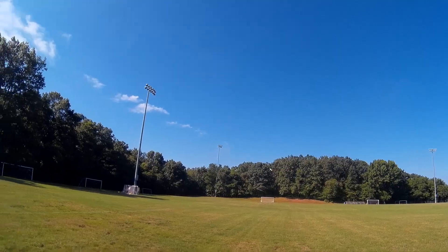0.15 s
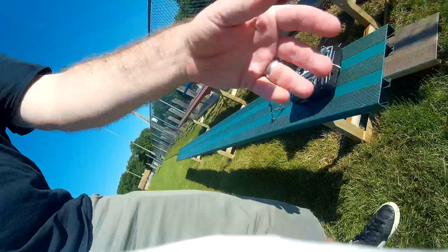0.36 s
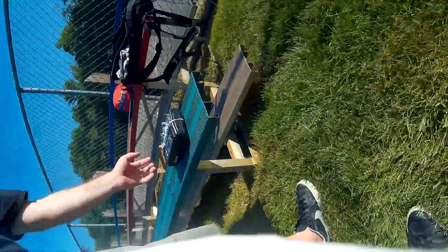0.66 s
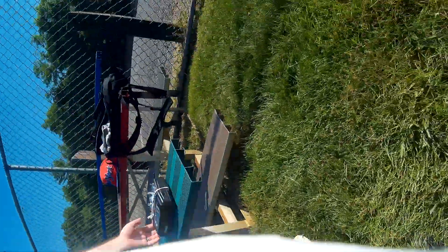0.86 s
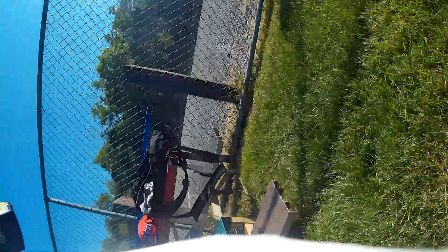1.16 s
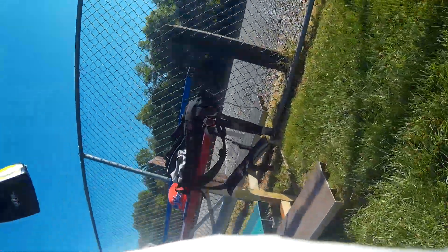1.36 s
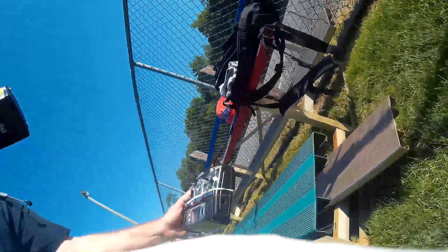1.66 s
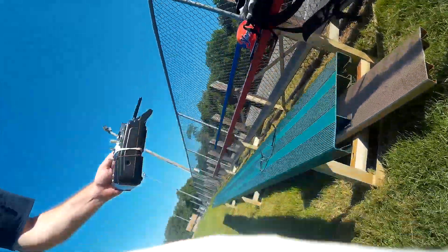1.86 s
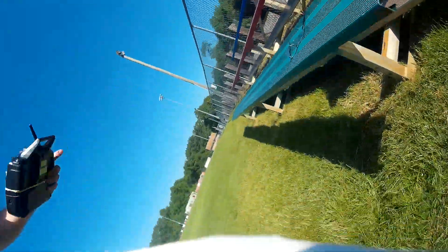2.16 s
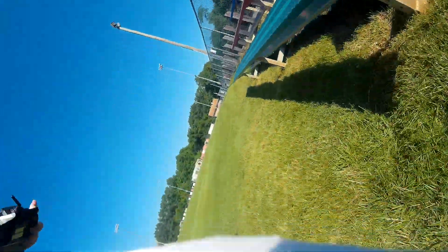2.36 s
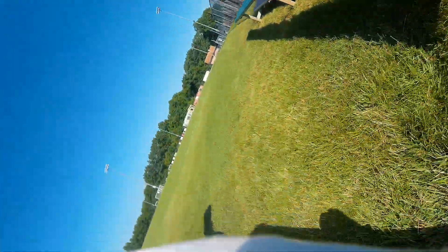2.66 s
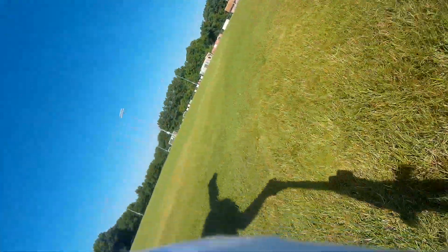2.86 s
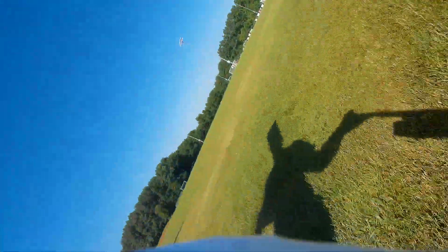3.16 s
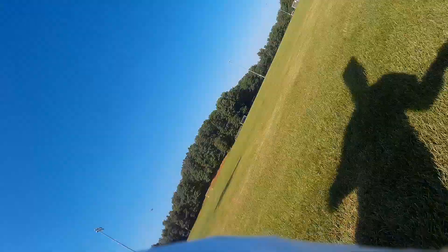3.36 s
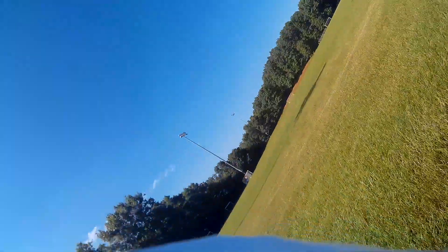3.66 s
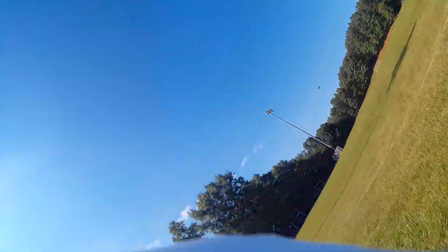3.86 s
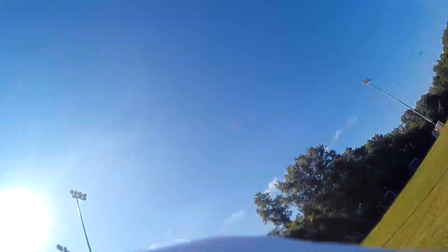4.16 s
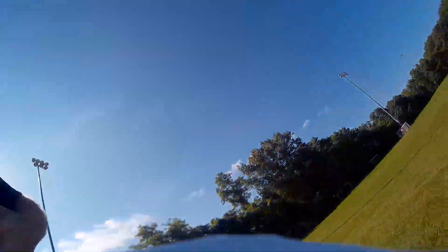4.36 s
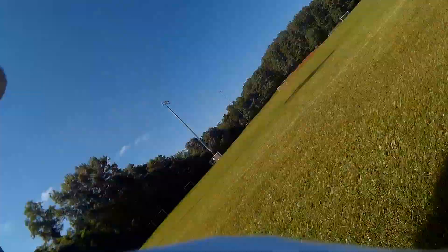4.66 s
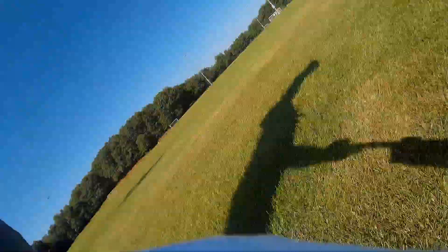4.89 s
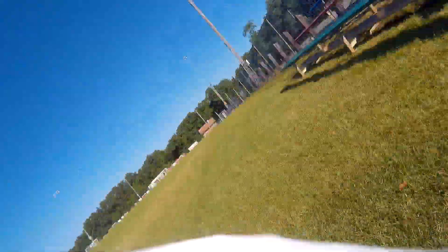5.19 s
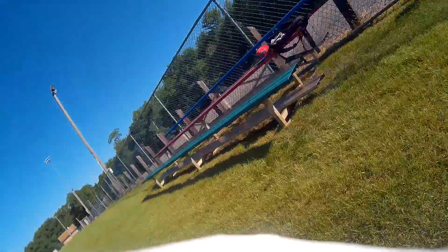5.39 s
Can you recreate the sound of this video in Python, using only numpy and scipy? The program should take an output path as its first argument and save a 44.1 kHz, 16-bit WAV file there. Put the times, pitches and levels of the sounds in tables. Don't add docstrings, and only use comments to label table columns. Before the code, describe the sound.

Open grassy field, close body-mounted microphone. Soft gusts and hiss lie under bird whistles and small taps on foam, with a hollow clunk before the middle. After low handling thumps, a small brushless motor kicks, stutters and surges into a loud buzz, clicks sharply, whirs down with a thin high whine, and stops; birds return.

```python
import sys
import numpy as np
from scipy import signal
from scipy.io import wavfile
from scipy.ndimage import uniform_filter1d

SR = 44100
rng = np.random.default_rng(int(sys.argv[2]) if len(sys.argv) > 2 else 0)


def gain_from_decibels(decibels):
    exponent = np.asarray(decibels, float) / 20
    return 10 ** exponent


def wav_out(sig):
    wavfile.write(sys.argv[1], SR, np.round(np.clip(np.atleast_2d(sig).T, -1, 1) * 32767).astype(np.int16))


N = 243873

# (t/s, speed/turns per s)
SHAFT_SPEED = [
    (3.393, 3.2),
    (3.425, 8),
    (3.47, 24.5),
    (3.52, 35),
    (3.6, 43),
    (3.67, 51.5),
    (3.785, 99),
    (3.83, 108.5),
    (3.87, 104),
]
# (t/s, level/dB)
MOTOR_EFFORT = [
    (3.362, -36),
    (3.385, -32.5),
    (3.446, -20.5),
    (3.566, -20),
    (3.578, -28),
    (3.62, -21),
    (3.64, -17),
    (3.82, -12.5),
    (3.89, -18),
]
RELEASE_S = 4.585


def evened(x):
    return x / np.sqrt(np.mean(x ** 2) + 1e-20)


def steady(x, size):
    return x / np.sqrt(uniform_filter1d(x ** 2, size) + 1e-12)


def drift(length, size):
    return evened(uniform_filter1d(rng.standard_normal(length), size=size))


def read(points, hz):
    f, value = np.transpose(points)
    return np.interp(np.log(hz + 1), np.log(f + 1), value)


def add(mix, s, sound):
    part = mix[round(s * SR):][:len(sound)]
    part += sound[:len(part)]


def noise(spectrum, size, patchy_db, length=N):
    frames = length * 4 // size + 5
    hz = np.fft.rfftfreq(size, 1 / SR)
    a, b, patches = rng.standard_normal((frames, len(hz), 3)).T
    patches = uniform_filter1d(patches, size=6, axis=0)
    patches = evened(uniform_filter1d(patches, size=6, axis=1))
    z = (a + 1j * b) * gain_from_decibels(read(spectrum, hz)[:, None] + patchy_db * patches)
    sound = signal.istft(z, nperseg=size, noverlap=size * 3 // 4)[1]
    return evened(sound[:length])


def swells(rows):
    t = np.arange(N) / SR
    return sum(db * np.exp(-((t - s) / half) ** 2) for s, half, db in rows)


def wind():
    # (f/Hz, level/dB)
    colour = [(8.8, -37.5), (15, -16.5), (33, 6.5), (103, 3), (346, -12), (438, -28), (500, -17),
              (650, -36), (1100, -120)]
    # (middle t/s, half length/s, rise/dB)
    gusts = [
        (.55, 0.19, 2.5),
        (1.48, 0.17, 13),
        (1.74, 0.069, 7.5),
        (3.25, 0.12, 8.5),
        (4.0, .6, 6),
        (4.75, 0.33, 10),
        (5.35, 0.2, 9),
    ]
    return noise(colour, size=2048, patchy_db=2.5) * gain_from_decibels(-66 + swells(gusts))


def rustle():
    # (f/Hz, level/dB)
    colour = [(150, -34), (250, -4.5), (511, 8), (616, 3), (1260, 4.5), (1960, -5), (2600, -8),
              (3380, -25.5), (5720, -120)]
    # (middle t/s, half length/s, rise/dB)
    shuffles = [
        (.72, .12, 11.5),
        (1.1, .15, 6),
        (1.52, .1, 13),
        (1.95, .3, 7),
        (2.85, .15, 7),
        (3.25, .12, 9.5),
        (4.2, .7, 8.5),
        (4.85, .2, 4),
        (5.3, .2, 7),
    ]
    return noise(colour, size=512, patchy_db=2.0) * gain_from_decibels(-76.5 + swells(shuffles))


def preamp_hiss():
    # (f/Hz, level/dB)
    colour = [(120, -31), (200, -6), (498, -16.5), (575, -17.5), (652, -3.5), (915, -16), (1240, -6),
              (5580, -6.5), (14400, -10)]
    return gain_from_decibels(-72) * noise(colour, size=1024, patchy_db=.5)


def bird(length, hz0, hz1, db, blur_hz):
    n = round(length * SR)
    hz = np.linspace(hz0, hz1, n) + blur_hz * drift(SR // 2, size=60)[:n]
    return gain_from_decibels(db) * np.sin(2 * np.pi * np.cumsum(hz) / SR) * signal.windows.tukey(n, .6)


def treeline(x):
    t = np.arange(SR // 2) / SR
    tail = rng.standard_normal(len(t)) * gain_from_decibels(-60 * t / 0.44) * np.clip(t / 0.0029, 0, 1)
    return signal.oaconvolve(x, tail / np.linalg.norm(tail))[:N]


def far_birds():
    # (start t/s, length/s, start f/Hz, end f/Hz, level/dB)
    whistles = [(.083, 0.2, 5300, 5060, -81), (.616, .075, 3560, 3030, -60.5), (.66, .065, 3213, 2780, -49),
                (1.478, 0.031, 2240, 2750, -69), (1.505, 0.078, 2790, 2480, -63.5),
                (1.56, 0.027, 2090, 2500, -75), (1.598, 0.031, 3000, 2730, -72),
                (1.484, .07, 1950, 2170, -73), (1.52, 0.037, 3150, 3020, -67.5),
                (1.63, .05, 2730, 3130, -70), (1.662, 0.031, 1650, 3190, -68),
                (1.876, 0.023, 3050, 3300, -66), (1.92, 0.1, 4120, 4320, -69),
                (2.66, .026, 3000, 2950, -74), (2.685, 0.059, 3710, 2210, -63.5),
                (2.8, 0.026, 2700, 2280, -68), (2.89, 0.13, 3560, 4000, -78),
                (5.055, 0.03, 2700, 2560, -77.5), (5.07, 0.056, 1914, 1690, -71),
                (5.418, 0.024, 1510, 2530, -63.5), (5.433, 0.064, 2500, 2750, -52)]
    # (start t/s, length/s, start f/Hz, end f/Hz, level/dB)
    chirps = [
        (.426, 0.047, 5450, 5170, -67.5),
        (.778, .032, 5500, 2430, -65.5),
        (1.806, .04, 6800, 6600, -76),
        (1.885, .06, 3400, 4000, -68),
        (1.99, .058, 5600, 5400, -71),
        (2.834, 0.046, 3750, 4600, -71),
        (5.242, .048, 5010, 3620, -58.5),
        (5.28, 0.082, 4480, 6100, -66.5),
        (5.31, .05, 6800, 6940, -67.5),
        (5.496, 0.013, 2350, 3200, -53),
    ]
    birds = np.zeros(N)
    for rows, blur_hz in ((whistles, 44), (chirps, 260)):
        for s, *note in rows:
            add(birds, s, bird(*note, blur_hz))
    return birds + gain_from_decibels(-3.5) * treeline(birds)


def body(tilt_db, deep=False):
    # (f/Hz, level/dB)
    colour = [(29, -54), (50, -28), (91, -13), (343, -11), (422, 0), (582, -6.5), (839, 1.5), (1670, 2),
              (2360, -11.5), (3100, -5), (3480, -15), (5890, -10.5), (12000, -56.5), (15600, -65),
              (22000, -120)]
    # (f/Hz, width/Hz, level/dB)
    panels = [(427, 44, 6), (722, 260, 11.5), (1044, 25, 8), (1271.3, 140, -2), (1574, 230, 5),
              (2010, 32, 8), (2410, 130, -10.5), (2632, 350, 5.5), (3030, 330, 6), (4050, 390, 6.5),
              (4530, 240, 3), (5300, 160, 8), (6030, 190, 2.5)]
    hz = abs(np.fft.fftfreq(4096, 1 / SR))
    db = read(colour, hz) + sum(g / (1 + (2 * (hz - f) / w) ** 2) for f, w, g in panels)
    db = db + tilt_db * np.log10(hz / 1000 + .1)
    gain = np.log(gain_from_decibels(np.maximum(db, -100)))
    ring = np.fft.ifft(np.exp(np.conj(signal.hilbert(gain)))).real[:2048]
    for delay in (17, 41, 73) if deep else ():
        loop = np.r_[1, np.zeros(delay - 1), -.55]
        ring = signal.lfilter(loop[::-1], loop, ring)
    return ring


def body_blows(mix):
    # (t/s, peak level/dB, brightness/dB per decade)
    blows = [(.523, -52, 21), (0.587, -49, 6), (0.715, -41, 0), (0.741, -42.5, 6), (.8, -47, 19),
             (0.937, -46.5, 5), (1.014, -47.5, -1), (1.088, -45, 5.5), (1.161, -45, 9.5), (1.39, -36, -10),
             (2.088, -56, 4), (3.134, -49, 35), (3.315, -49.5, 16.5), (3.363, -24.5, -17.5),
             (3.373, -20, -18), (4.816, -43.5, -11), (4.826, -41, -36), (5.065, -51.5, 7)]
    for s, db, tilt_db in blows:
        blow = body(tilt_db, deep=tilt_db < 0)
        add(mix, s, gain_from_decibels(db) * blow / abs(blow).max())


def dry_ticks(mix):
    # (t/s, peak level/dB, f/Hz, length/ms)
    ticks = [(1.2841, -43, 10800, .23), (1.2821, -57, 12900, .21), (1.2826, -56, 7600, .4),
             (1.3351, -56, 10000, .7), (1.3491, -55, 5050, .9), (3.1331, -63, 4400, .7),
             (3.3151, -64, 4200, .7), (3.3761, -49, 7100, .9), (3.9854, -25, 12400, .26),
             (3.9864, -4, 5150, .12), (3.9854, -18, 7200, .25), (3.986, -20, 9700, .25),
             (3.9864, -12, 4100, .23), (4.543, -58, 5300, .8)]
    for s, db, hz, ms in ticks:
        u = np.arange(400) / SR * 1000 / ms
        swell = np.e * u * np.exp(-u)
        add(mix, s, gain_from_decibels(db) * swell * np.sin(2 * np.pi * hz * u * ms / 1000))


def knock():
    # (f/Hz, level/dB, t60/s)
    hollow = [(526, -10.5, 0.87), (667, -11, 0.79), (950, -3, 0.81), (1120, -6, 0.59), (1400, 11, 0.051),
              (1580, 6.5, 0.11), (1415, -9, 0.9), (1693, -7.5, 0.5), (2160, -13, 0.24), (2910, -32, 3.7)]
    # (f/Hz, level/dB)
    colour = [(120, -40), (200, 7), (447, -14), (522, -15), (1190, -9), (1410, -3), (2440, -22),
              (2750, -18.5), (12000, -51), (15600, -76.5), (22000, -120)]
    t = np.arange(SR // 2) / SR
    modes = np.zeros(len(t))
    for hz, db, t60 in hollow:
        rattle_db = 4 * drift(len(t), size=500)
        modes += gain_from_decibels(db - 60 * t / t60 + rattle_db) * np.sin(2 * np.pi * hz * t)
    modes *= np.clip(t / .002, 0, 1)
    decay = 0.433 * gain_from_decibels(-60 * t / 0.021) + 0.19 * gain_from_decibels(-60 * t / 0.38)
    spray = noise(colour, size=256, patchy_db=-0.5, length=len(t)) * decay
    return gain_from_decibels(-33) * (0.2 * modes + spray)


def finger_thumps(mix):
    # (t/s, peak level/dB, f/Hz)
    thumps = [(1.72, -40, 170), (3.117, -42, 230), (3.14, -34.5, 260), (3.171, -41, 186), (3.177, -30, 167),
              (3.201, -30, 94), (3.219, -26.5, 131), (3.266, -51, 100), (3.29, -37, 143), (3.315, -33, 121),
              (5.004, -38, 113)]
    for s, db, hz in thumps:
        u = np.arange(1500) * hz / SR
        add(mix, s, gain_from_decibels(db) * (1 - 3.4 * u) * np.exp(-3.5 * u) * np.clip(u * 8, 0, 1))


def shaft(t):
    drag_per_s, rub = 1.85, 15
    free_s, top = SHAFT_SPEED[-1]
    coast = (top + rub) * np.exp(-drag_per_s * (t - free_s)) - rub
    return np.where(t < free_s, np.interp(t, *np.transpose(SHAFT_SPEED)), coast)


def surges(t):
    # (start t/s, cut t/s, level/dB)
    pushes = [
        (3.44, 3.471, 9),
        (3.485, 3.508, 6),
        (3.518, 3.541, 8),
        (3.545, 3.568, 9),
        (3.625, 3.69, 3),
    ]
    return sum(db * np.interp(t, [a, a + 0.2 * (b - a), b, b + 0.0016], [0, 1, 1, 0]) for a, b, db in pushes)


def shake_level(t, on, speed_db):
    grip = np.interp(t, [4.37, RELEASE_S, RELEASE_S + 0.024], [0, 1, 0])
    coasting_db = (1 - on) * (-4 + 1.827 * speed_db)
    return np.interp(t, *np.transpose(MOTOR_EFFORT)) + 8.5 * grip + coasting_db


def pulses(turn, speed, per_turn, count, odd, slope_db):
    train = 0
    for k in range(1, count):
        gain = (odd if k % 2 else 1) * gain_from_decibels(slope_db * np.log2(k))
        train = train + gain * np.cos(k * per_turn * turn) * (k * per_turn * speed < 9000)
    return train


def coil_kicks(speed, speed_db, turn, late, switch):
    # (share of switching tone, cycles per turn, level/dB, slope/dB per dB of speed)
    folds = [
        (0, 42, -3, .3),
        (.5, -21, -3, 5),
        (.5, 0, -10, 2.5),
        (1, -21, -1, 6),
        (1, -42, -14, .4),
    ]
    limp = .7 * np.clip((speed - 24) / 10, .12, 1)
    kicks = pulses(turn + .014 * late, speed, 21, count=110, odd=limp, slope_db=-3)
    whistles = sum(gain_from_decibels(db + p * speed_db) * np.cos(share * switch + k * (turn + .012 * late))
                   for share, k, db, p in folds)
    return steady(kicks, size=2000) + whistles


def cogging(speed, turn, uneven, falter, switch):
    # (cycles per turn, level/dB)
    orders = [(12, -12), (14, -6), (28, -12), (36, -8), (42, 0), (72, -10), (84, -6.5)]
    cogs = evened(sum(gain_from_decibels(db) * np.cos(k * turn) / (1 + (k * speed / 2200) ** 16) for k, db in orders))
    cogs = cogs * (1 + .3 * np.cos(2 * turn) + .3 * uneven) * gain_from_decibels(2.5 * falter)
    return cogs + gain_from_decibels(-4) * np.cos(switch - 84 * turn) / (1 + (speed / 27) ** 6)


def blade_thrust(speed, speed_db, turn):
    # (cycles per turn, level/dB)
    tones = [(1, -35), (2, -35.5), (3, -47), (4, -28), (5, -34), (6, -33), (8, -27), (10, -31), (12, -32)]
    return sum(gain_from_decibels(db + (1.9 + .5 * k) * speed_db) * np.cos(k * turn) / (1 + (68 / k / speed) ** 8)
               for k, db in tones)


def tip_hiss(passes, on, speed_db):
    # (f/Hz, level/dB)
    colour = [(1470, -28), (2500, 1), (3020, -5), (3610, -6.5), (5890, -9), (11600, -18.5), (14400, -22)]
    hiss = noise(colour, size=256, patchy_db=.8, length=len(passes))
    return hiss * steady(passes, size=4000) * gain_from_decibels(-42 + 2.63 * speed_db + 5 * on + 11.5)


def controller_whine(t, on, speed_db, turn, switch):
    # (cycles per turn, coasting level/dB, throttle level/dB)
    sides = [(0, 0, 0), (-2, -1, -8), (14, -11, -11), (-14, -6, -14)]
    whine = sum(gain_from_decibels(off + (full - off) * on) * np.cos(switch + k * turn) for k, off, full in sides)
    fade_db = 65.5 * np.maximum(t - RELEASE_S, 0)
    return gain_from_decibels(-54.5 + 0.65 * speed_db + 12.5 * on - fade_db + 6.5) * whine


def motor():
    t = np.arange(MOTOR_EFFORT[0][0], 4.83, 1 / SR)
    speed = shaft(t)
    speed_db = 20 * np.log10(speed / 100)
    turn = 2 * np.pi * np.cumsum(speed) / SR + 2.0
    switch = 2 * np.pi * 7979 * t
    on = 1 / (1 + np.exp((t - 3.9) / 0.0076))
    surge_db = surges(t)
    uneven, late, falter = drift(len(t), 50), drift(len(t), 50), drift(len(t), 500)

    coils = coil_kicks(speed, speed_db, turn, late, switch) * (1 + .5 * uneven) * gain_from_decibels(3 * falter)
    coil_db = 6 - .45 * speed_db - 10 * np.clip((t - 3.825) / 0.013, 0, 1)
    core = gain_from_decibels(coil_db - 6.5 + 0.15 * surge_db) * on * coils
    core += gain_from_decibels(-4) * (1 - on) * cogging(speed, turn, uneven, falter, switch)

    slaps = evened(pulses(turn + .02 * late, speed, 1, count=40, odd=.6, slope_db=-1.5))
    slaps = slaps * (1 + .15 * uneven)
    slap_db = on * -7 + (1 - on) * np.minimum(-6 - 0.48 * speed_db, 15)
    passes = .6 + 1.6 * (speed / 100) ** 1.2 * np.exp(5 * (np.cos(2 * turn) - 1))
    rush_db = 5.5 + 0.083 * on * speed_db - 9 * np.clip((t - RELEASE_S) / .02, 0, 1)
    blades = gain_from_decibels(slap_db + 1.5 + 1.5 * speed_db) * slaps
    blades += gain_from_decibels(rush_db) * passes * rng.standard_normal(len(t))

    shake = signal.oaconvolve(core, body(tilt_db=4.5, deep=True))
    shake += signal.oaconvolve(blades, body(tilt_db=2.5))
    shake = steady(shake[:len(t)], size=800) * (t > SHAFT_SPEED[0][0])
    shake *= gain_from_decibels(shake_level(t, on, speed_db) + 0.72 * surge_db - 2.5)
    sound = shake + blade_thrust(speed, speed_db, turn) + tip_hiss(passes, on, speed_db)
    sound += controller_whine(t, on, speed_db, turn, switch)
    return t[0], sound * signal.windows.tukey(len(t), .004)


def scene():
    near = wind() + rustle() + preamp_hiss()
    birds = far_birds()
    body_blows(near)
    dry_ticks(near)
    add(near, 1.3335, knock())
    finger_thumps(near)
    add(near, *motor())
    return (near + birds)[None]


def band_limit(x):
    return signal.sosfilt(signal.butter(12, 14550, fs=SR, output="sos"), x)


def record(dry):
    loud = 0.59 * np.tanh(dry / 0.68)
    lowpass = signal.firwin(255, 14380, window=("kaiser", 9), fs=SR)
    cut = signal.oaconvolve(loud, lowpass[None], "same")
    return band_limit(cut)


dry = scene()
out = record(dry)
wav_out(out)
```